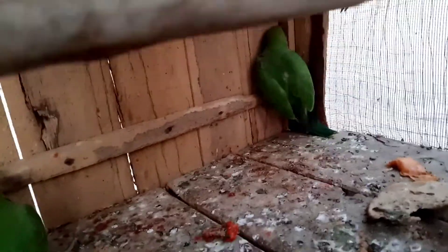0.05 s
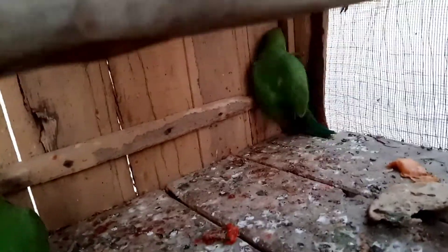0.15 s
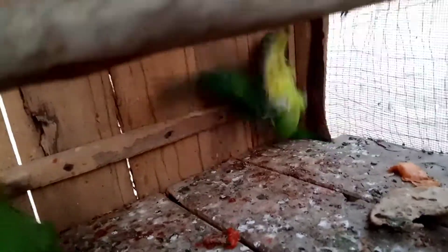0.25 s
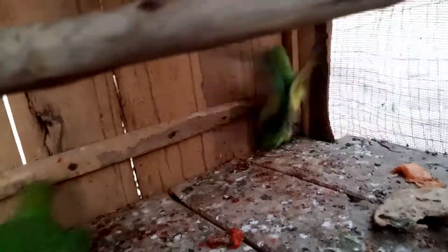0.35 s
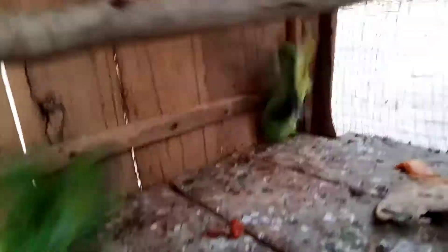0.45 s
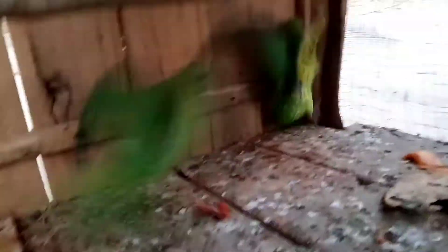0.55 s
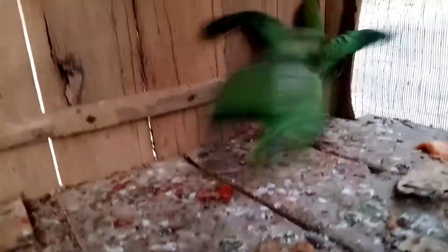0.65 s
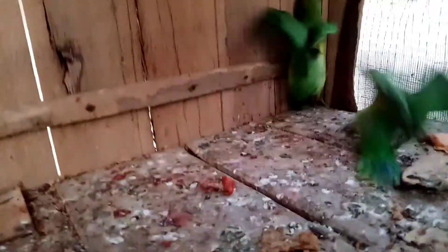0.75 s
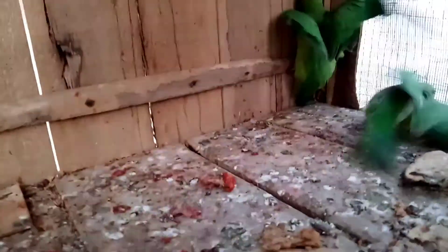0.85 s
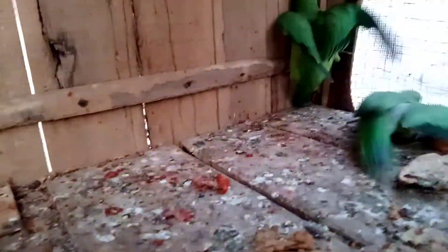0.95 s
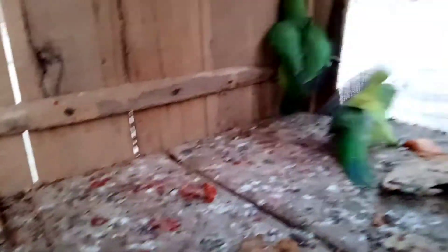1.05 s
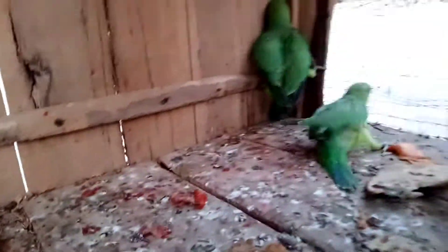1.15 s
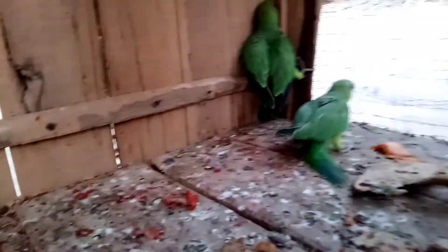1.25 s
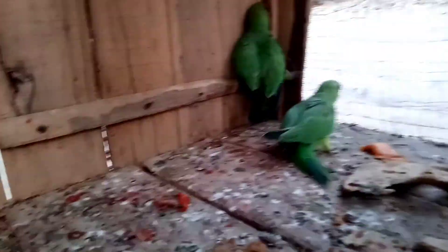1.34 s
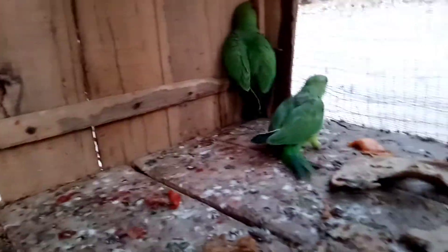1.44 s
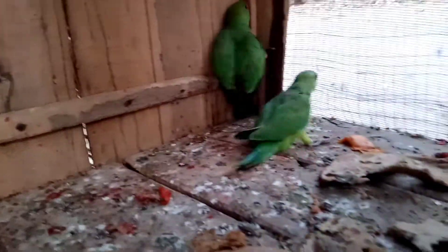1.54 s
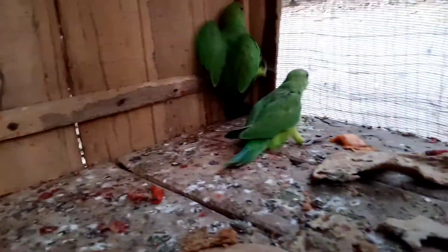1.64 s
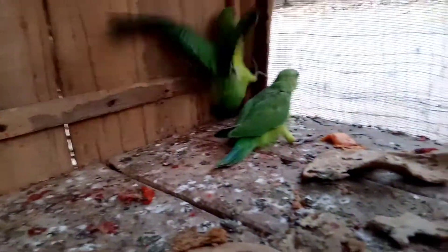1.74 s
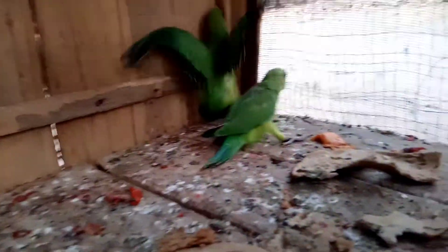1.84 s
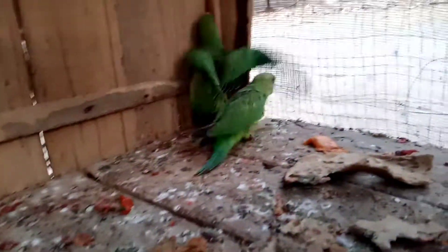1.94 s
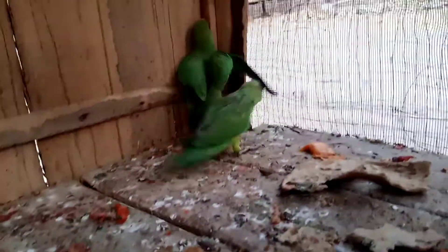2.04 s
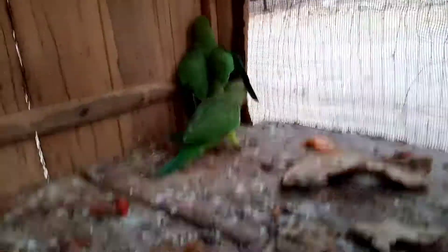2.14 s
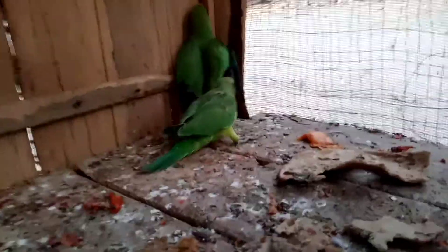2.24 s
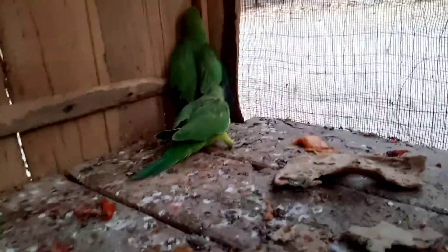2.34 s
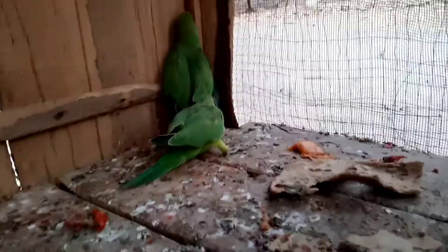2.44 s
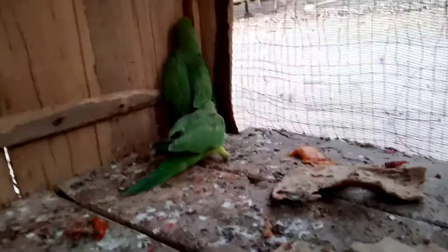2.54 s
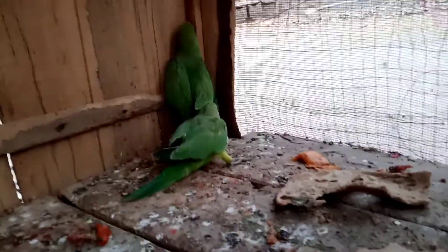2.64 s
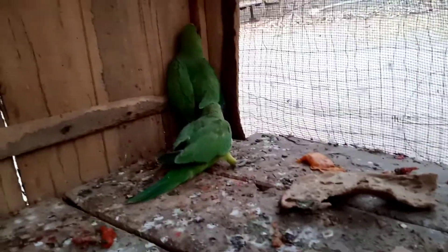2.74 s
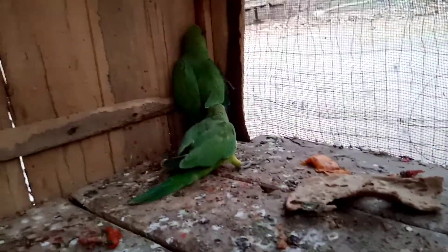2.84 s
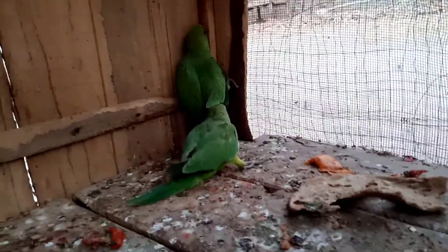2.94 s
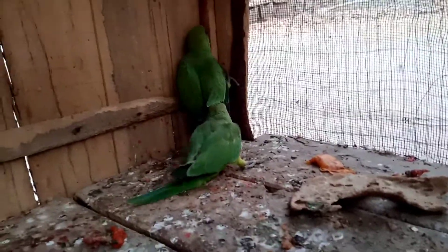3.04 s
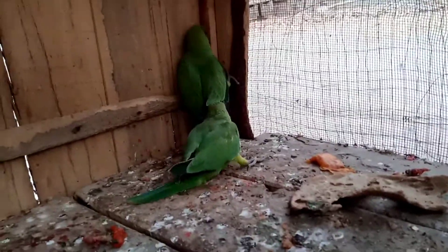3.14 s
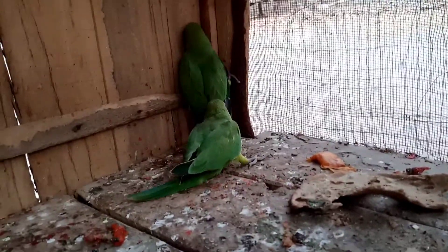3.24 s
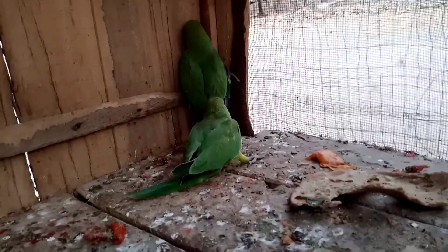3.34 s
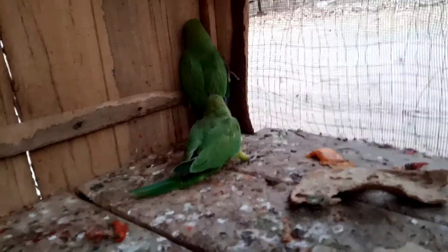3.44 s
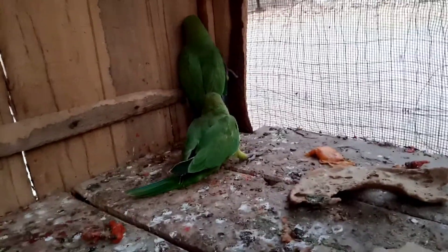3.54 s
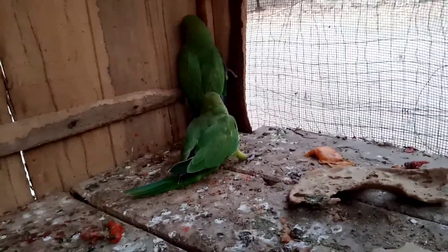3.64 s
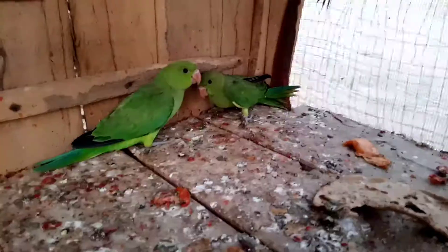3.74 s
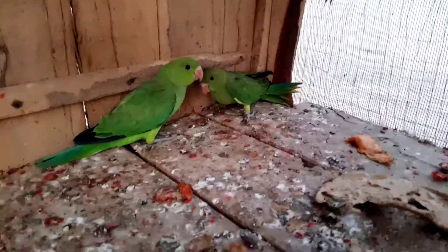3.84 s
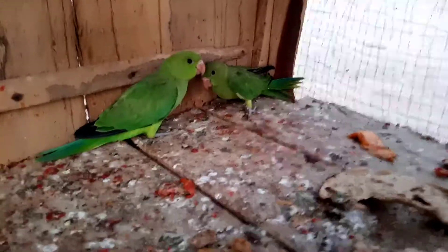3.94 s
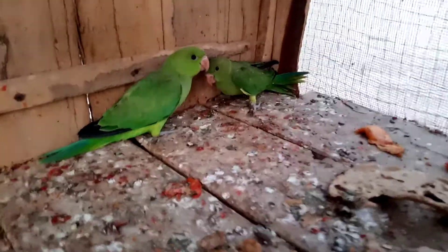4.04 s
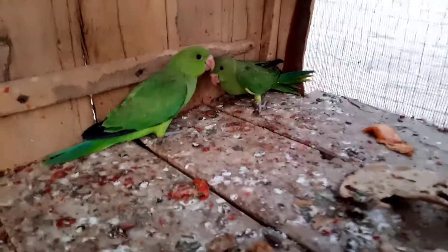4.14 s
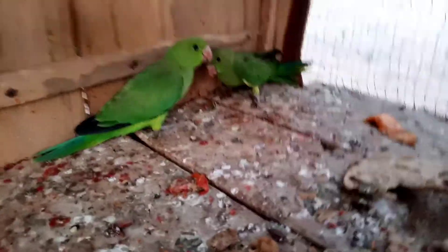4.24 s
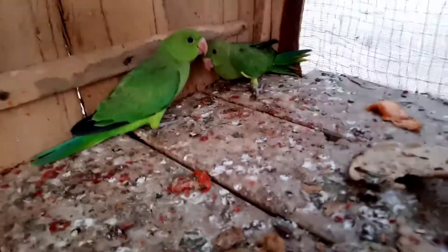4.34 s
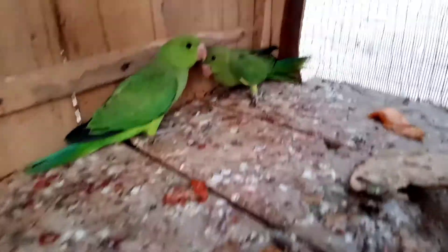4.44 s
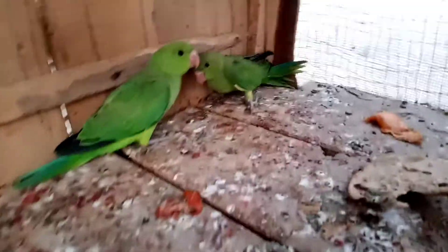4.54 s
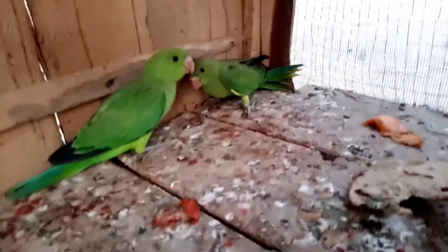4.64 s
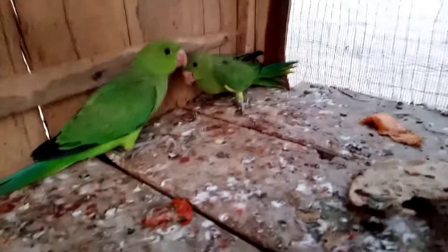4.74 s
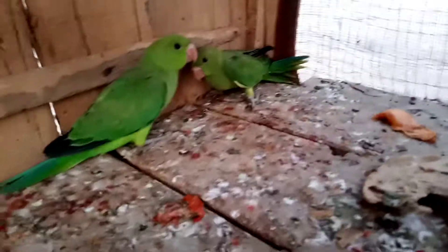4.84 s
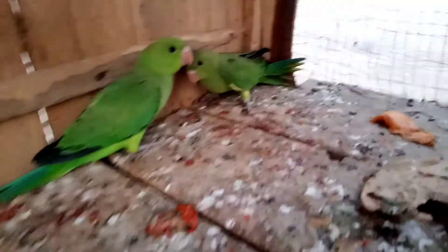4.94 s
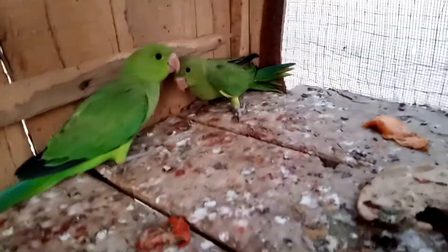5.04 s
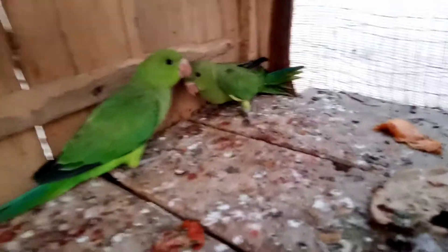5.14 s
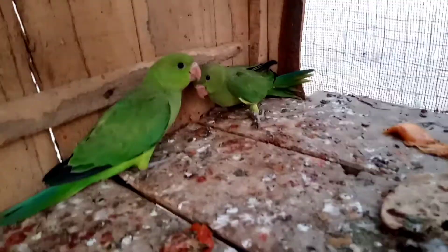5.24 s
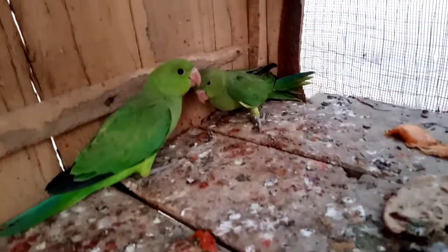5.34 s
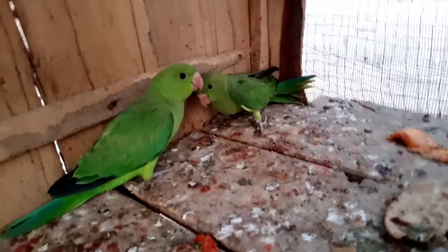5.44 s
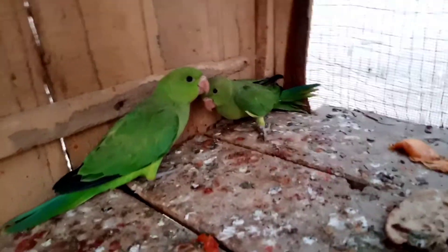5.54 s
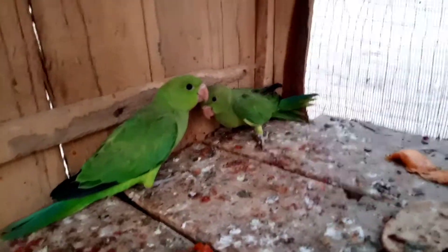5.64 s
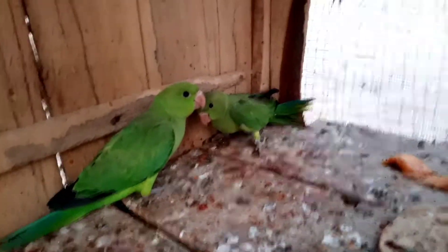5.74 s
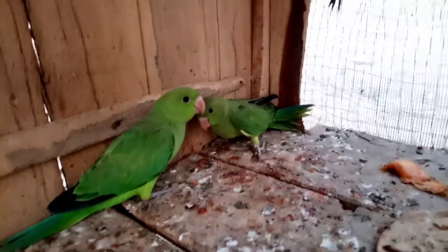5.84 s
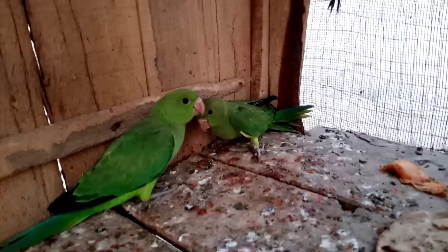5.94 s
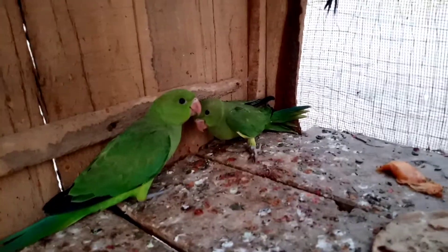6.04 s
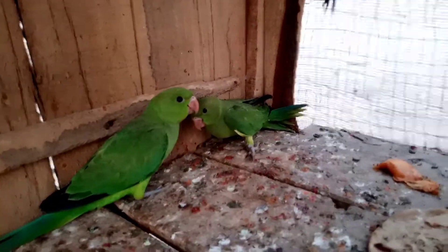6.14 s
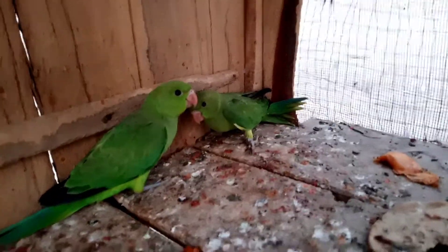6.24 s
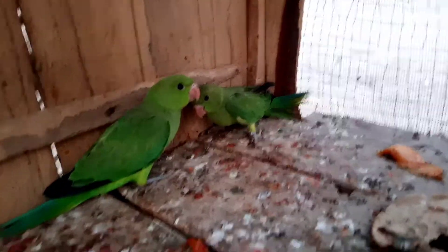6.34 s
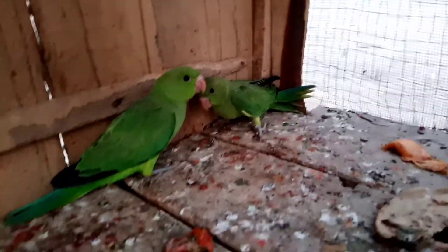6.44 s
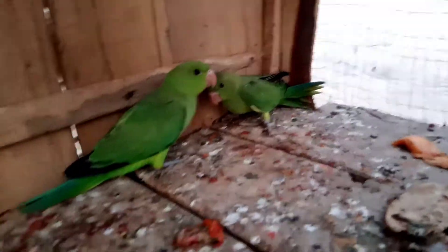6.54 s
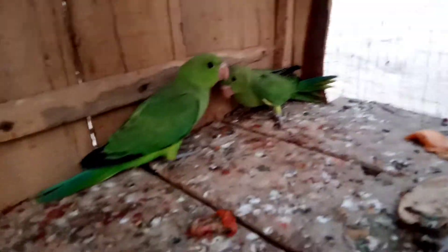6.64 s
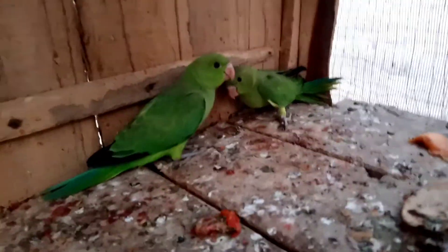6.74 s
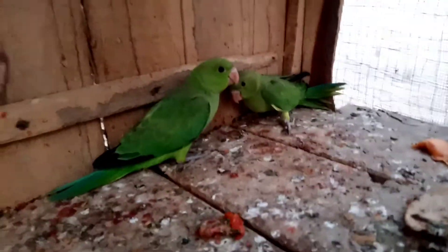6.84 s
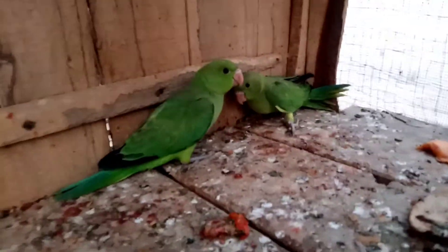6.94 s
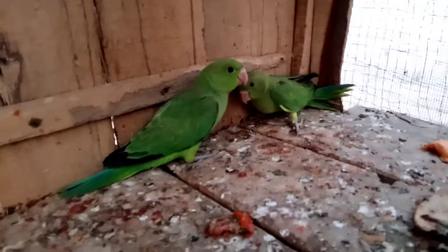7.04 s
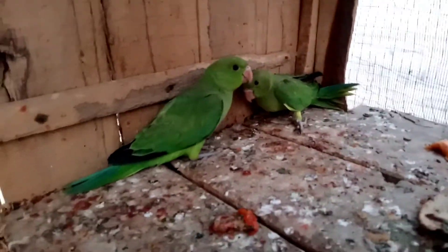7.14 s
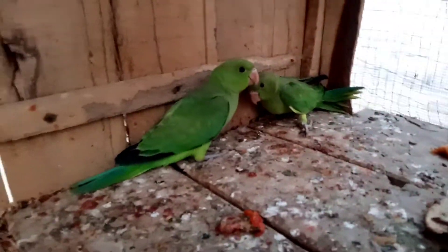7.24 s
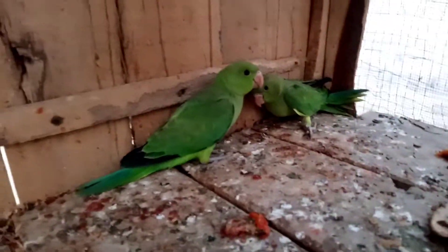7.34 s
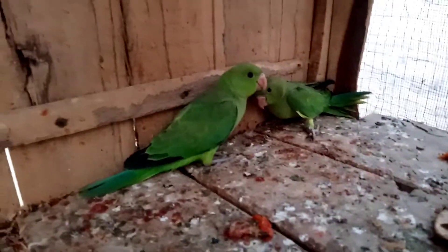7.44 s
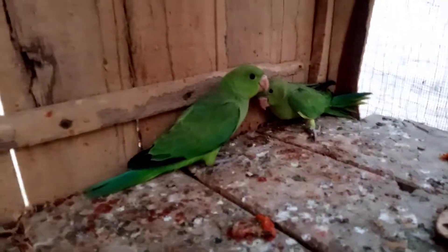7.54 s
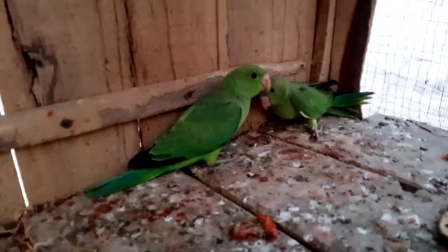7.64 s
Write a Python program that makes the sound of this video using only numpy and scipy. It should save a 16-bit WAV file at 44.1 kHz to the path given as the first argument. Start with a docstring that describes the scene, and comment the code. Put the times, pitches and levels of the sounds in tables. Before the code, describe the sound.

Wings flap and rustle in bursts inside a wooden box, a few short squeaks, a brief dropout, then outdoor birds whistle and chirp over low hum.

```python
"""Young parrots in a nest box

Young parrots flap, scrabble and rustle (shaped noise, board resonances) in a wooden box with a wire front.
They squeak a few times (harmonic sine stacks); small birds outside whistle (gliding sines) and chatter
(trembling chirps) in an echoing yard, over a low wavering hum and a thin hiss (filtered noise).
The sound drops out for a moment in the middle and fades back in."""
import sys
import numpy as np
from scipy import signal
from scipy.fft import rfft, irfft, next_fast_len
from scipy.io import wavfile
from scipy.ndimage import uniform_filter1d, map_coordinates

SR = 44100
rng = np.random.default_rng(int(sys.argv[2]) if len(sys.argv) > 2 else 0)


def dump_mix(stems):
    """Bounce the given channels to the path in sys.argv[1] as a 16-bit WAV at rate SR."""
    frames = np.atleast_2d(stems).T  # one column per channel
    limited = np.clip(frames, -1, 1)  # hard clip at full scale
    pcm = np.round(limited * 32767).astype(np.int16)
    wavfile.write(sys.argv[1], SR, pcm)


N = 338688

# Spectrum of feathers on wood and wire. Each row: frequency in Hz, relative density in dB per Hz.
FEATHER_SPECTRUM = [(900, -15.5), (1800, -4), (3800, 4), (6500, 1), (8000, -7.5), (9800, -34.5),
                    (12000, -54.5)]
# Spectrum of the fine treble. Each row: frequency in Hz, relative density in dB per Hz.
FINE_SPECTRUM = [(7000, -43.5), (9000, -10), (13400, -17.5), (15000, -4.5), (16000, -12)]


def amp(db):
    """Decibel law: the amplitude gain of a level in dB."""
    return 10 ** (np.asarray(db) / 20)


def unit(x):
    """Normalisation by energy: x at rms 1."""
    return x / np.sqrt(np.mean(x ** 2) + 1e-20)


def curves(rows):
    """Linear interpolation: one value per sample for each column after the time."""
    s, *cols = np.transpose(rows)
    return [np.interp(np.arange(N) / SR, s, c) for c in cols]


def wobble(rate):
    """Band-limited fluctuation: a smooth curve through random knots, rate of them a second."""
    knots = rng.standard_normal(int(N * rate / SR) + 4)
    return map_coordinates(knots, [np.arange(N) * rate / SR])


def filtered(x, response):
    """Linear filtering: the spectrum of x times a response of frequency."""
    m = next_fast_len(len(x) + 8192)
    return irfft(rfft(x, m) * response(np.fft.rfftfreq(m, 1 / SR)), m)[:len(x)]


def noise(spectrum, size=N, patchy_db=0, frame=256):
    """Coloured noise of rms 1 with time-frequency patches of random gain; long frames make thin streaks."""
    f, db = np.transpose(spectrum)
    x = rng.standard_normal(size + 2 * frame)
    if patchy_db:
        z = signal.stft(x, nperseg=frame)[2]
        field = uniform_filter1d(rng.standard_normal(z.shape), size=1024 // frame, axis=0)
        field = uniform_filter1d(field, size=6, axis=1)
        x = signal.istft(z * amp(patchy_db * unit(field)), nperseg=frame)[1]

    def colour(hz):
        """Spectral envelope: dB interpolated over log frequency."""
        return amp(np.interp(np.log(hz + 1), np.log(f), db, -120, -120))
    return unit(filtered(x[:size], colour))


def echoes(x, t60, wet_db):
    """Diffuse reverberation: an exponentially dying noise tail (60 dB in t60 s), 4 ms behind x."""
    t = np.arange(SR // 2) / SR
    tail = rng.standard_normal(len(t)) * amp(-60 * t / t60) * (t > .004)
    return x + amp(wet_db) * signal.fftconvolve(x, tail / np.linalg.norm(tail))[:N]


def calls(table, shape):
    """Pitch contour: (s, pitch Hz, dB) points of each call, from its row and the course of its kind."""
    contours = []
    for turn_s, climb, sink, first, hz, last, db in table:
        points = []
        for place, way, step in shape:
            stretch, end_hz = (climb, first) if place < 0 else (sink, last)
            points.append((turn_s + place * stretch, hz + way * (end_hz - hz), db + step))
        contours.append(points)
    return contours


def notes(table, tone, flutter_db, waver):
    """Additive synthesis: harmonics along each contour flutter in strength while the pitch wavers."""
    out, drift = np.zeros(N), 1 + waver * wobble(120)
    flutter = [amp(flutter_db * wobble(90)) for _ in tone]
    for note in table:
        s, hz, db = np.transpose(note)
        i = np.arange(round(s[0] * SR), round(s[-1] * SR))
        pitch = uniform_filter1d(np.interp(i / SR, s, hz), size=400, mode="nearest") * drift[i]
        phase = 2 * np.pi * np.cumsum(pitch) / SR
        edge = np.clip(np.minimum(i - i[0], i[-1] - i) / (0.0017 * SR), 0, 1)  # 1.7 ms ramps
        stack = sum(amp(level) * flutter[k][i] * np.sin((k + 1) * phase) for k, level in enumerate(tone))
        out[i] += np.sqrt(2) * amp(np.interp(i / SR, s, db)) * edge * stack
    return out


def wood(x):
    """Modal resonance: x through the band-pass modes of the boards, summed with alternating sign."""
    # Modes of the boards. Each row: centre in Hz, width in Hz, relative level in dB.
    modes = [(154, 39, -2), (271.3, 52, -4), (426.3, 49, 0.5), (549, 65, -2), (710, 155, -3.5),
             (1100, 102, 1), (1390, 400, -6.5), (2020, 330, -8.5)]

    def response(f):
        """Sum of second-order resonances."""
        return sum((-1) ** k * amp(db) * 1j * f * w / (c * c - f * f + 1j * f * w)
                   for k, (c, w, db) in enumerate(modes))
    return filtered(x, response)


def background():
    """Filtered noise: the low hum wavers in level; a thin streaky hiss lies over it."""
    # Spectrum of the hum. Each row: frequency in Hz, relative density in dB per Hz.
    hum_spectrum = [(15, -69), (25, -34), (38, -24.5), (57, -10), (81, 2.5), (150, -9.5), (220, -26.5),
                    (290, -67.5), (480, -120)]
    # Spectrum of the hiss. Each row: frequency in Hz, relative density in dB per Hz.
    hiss_spectrum = [(150, 10), (300, -1.5), (1000, -8.5), (3000, -4.5), (6000, -15.5), (8300, -10.5),
                     (9500, -29.5), (14000, -46.5), (15600, -18.5)]
    # Course of the hiss. Each row: time in seconds, level in dB before its wavering.
    hiss_course = [(0, -67), (3.4, -69.5), (4.2, -63.5), (5.4, -60.5), (7.68, -61.5)]
    hum = amp(-52.5 + 0.85 * wobble(2.6)) * noise(hum_spectrum)
    hiss_gain = amp(curves(hiss_course)[0] + 1.5 * wobble(4))
    return hum + hiss_gain * noise(hiss_spectrum, patchy_db=4.6, frame=768)


def movement():
    """Addition of powers: gains of feathers, boards and fine treble from shuffling and swells of rustling."""
    # Shuffling that swells and fades beneath the swells of rustling. Each row: time in seconds, level in dB,
    # boards' share in dB, fine treble share in dB.
    shuffling = [(0, -55.5, -12, -20.5), (.25, -50.5, -3, -12.5), (1.2, -57, -3, -20.5),
                 (2.25, -62, -22, -17), (2.77, -79.5, -20, -11), (2.84, -66, -19, -13.5),
                 (3.25, -75.5, -18.5, -13), (3.55, -80, -28, -16), (5.3, -66, -9, -18),
                 (5.89, -66, -15, -32), (6.05, -54, 1, -20), (6.7, -68, 3, -32), (6.75, -55.5, -12, -14.5),
                 (6.95, -56, -9, -16), (7.25, -57, -1, -23.5), (7.56, -54.5, 0, -17.5)]
    # Swells of rustling over wood, wire and litter; close rows merge into one longer swell. Each row:
    # turning time in seconds, level there in dB, time to die 20 dB in seconds (negative: growing on),
    # boards' share in dB, fine treble share in dB.
    swells = [(.35, -48, 0.45, -4, -7.5), (0.591, -33, 0.1242, -3.5, -5.5), (.68, -40, 0.1, -2, -9),
              (0.863, -33, 0.3028, -7.5, -14.5), (1.511, -46.5, 0.1, -7.5, -9.5),
              (1.629, -48.5, 0.26, -3, -10.5), (1.815, -43.5, 0.2551, -9, -17.5),
              (2.071, -46, 0.24, -12.5, -16.5), (2.795, -52, 0.05, -24, -10.5),
              (2.99, -51.5, 0.15, -18, -15), (3.162, -51, 0.16, -17, -12), (5.39, -51, .4, -14.5, -33),
              (5.469, -46, 0.15, -14, -31.5), (5.7, -49.5, 0.4, -15.5, -32), (5.918, -51, .8, 1, -29),
              (5.989, -44.5, 0.7, -5.5, -23), (6.25, -50, 0.2, -7, -19), (6.819, -50, 0.7, -8, -13),
              (6.895, -47, 0.3, -10.5, -15.5), (6.985, -38, 0.14, -17.5, -19),
              (7.026, -27, 0.07, -23, -18.5), (7.044, -28, 0.0642, -13.5, -20),
              (7.099, -54, 0.75, -11, -18.5), (7.4, -46, .5, -3.5, -18.5), (7.624, -45, -1.35, -7, -15)]
    rise_s, rise_share = .025, .015  # time to swell 20 dB: a fixed part and a share of the dying time
    t, (db, boards_db, fine_db) = np.arange(N) / SR, curves(shuffling)
    power = amp(2 * np.array([db, db + boards_db, db + fine_db]))
    for s, db, dies_s, boards_db, fine_db in swells:
        fade = np.maximum((s - t) / (rise_s + rise_share * dies_s), (t - s) / dies_s)
        shares = amp(2 * np.array([[0], [boards_db], [fine_db]]))
        power = power + amp(2 * (db - 20 * fade)) * shares
    return np.sqrt(power)


def rustle():
    """Stick-slip friction: feathers brush wood and wire, uneven and crackly; the boards resonate."""
    brush, touch, sheen = movement()
    unevenness = 2.3 * wobble(32)  # dB, shared by all bands: the whole rustle wavers together
    ticks = rng.random(N) < 150 / SR  # 150 a second on average
    snaps = uniform_filter1d(ticks * rng.random(N), size=24)
    crackle = signal.lfilter([1], [1, -.98], snaps)  # barbs catch and let go
    grain = 1 + 1.24 * crackle
    feathers = unit(grain * noise(FEATHER_SPECTRUM, patchy_db=5, frame=512))
    boards = amp(1.2 * wobble(25)) * unit(grain * wood(rng.standard_normal(N)))
    sizzle = unit(grain * noise(FINE_SPECTRUM, patchy_db=2.5))
    fine = amp(3.0 * wobble(22)) * sizzle
    return amp(unevenness) * (brush * feathers + touch * boards + sheen * fine)


def slaps():
    """Impact excitation: each contact is a ragged noise puff around its own pitch, with a brief ring."""
    # Wing slaps and claw scratches. Each row: start in seconds, relative level in dB, centre in Hz.
    contacts = [(0.248, -25, 5560), (0.2699, -17.5, 2050), (0.311, -29.5, 5840), (0.33, -22, 4660),
                (0.36, -25.5, 5200), (0.374, -23, 4830), (0.4036, -18, 6050), (0.4504, -21.5, 6700),
                (0.509, -26, 5170), (0.5458, -17.5, 6880), (0.577, -9.5, 6900), (0.5916, -15.5, 4240),
                (0.623, -23.5, 3700), (0.636, -15, 3930), (0.648, -22.5, 4560), (0.677, -17.5, 6300),
                (0.689, -14.5, 6550), (0.728, -32, 6500), (0.7788, -25.5, 3640), (0.795, -20, 6360),
                (0.81, -22, 6200), (0.8565, -18, 4400), (1.0217, -28.5, 7530), (1.281, -29.5, 5000),
                (1.3227, -35, 6350), (1.419, -32, 2970), (1.4558, -28.5, 2465), (1.5, -31, 3200),
                (1.609, -29, 2740), (1.8063, -32.5, 3560), (1.867, -31, 3900), (1.8944, -21, 3370),
                (2.052, -34, 4470), (2.5186, -35.5, 2720), (2.8846, -42, 3320), (2.956, -33.5, 4230),
                (3.052, -27.5, 1196), (3.0903, -45, 7000), (3.1508, -31, 1870), (3.67, -49, 5260),
                (5.142, -36, 2800), (5.7943, -34.5, 4200), (6.976, -22.5, 4730), (7.0161, -26, 5580),
                (7.273, -38, 6100), (7.453, -22.5, 4880), (7.503, -18.5, 4970)]
    ring_share, ring_t60 = 0.49, 0.071  # ring of a 3 kHz spot (lower ones ring more), its 60 dB decay in s
    tick_db, tick_t60 = -16.5, .015  # thin treble tick, its 60 dB decay in s
    out, t = np.zeros(N + SR), np.arange(SR // 4) / SR
    shape = np.exp(-(t / .011) ** 1.5) * (1 - np.exp(-t / 0.0027))  # a rounded puff that soon stops
    for s, db, hz in contacts:
        steps = np.repeat(rng.standard_normal(len(t) // 60 + 1), 60)[:len(t)]
        ragged = amp(2.9 * steps)  # several barbs land apart
        peak = [(hz / 3, -30), (hz / 1.25, -9), (hz, 0), (hz * 1.17, -9), (hz * 4, -36)]
        puff = 0.87 * noise(FEATHER_SPECTRUM, size=len(t)) + noise(peak, size=len(t))
        puff = puff + amp(-28.0) * noise(FINE_SPECTRUM, size=len(t))
        tick = amp(tick_db - 60 * t / tick_t60) * noise(FINE_SPECTRUM, size=len(t))
        ring = ring_share * 3000 / hz * amp(-60 * t / ring_t60) * np.sin(2 * np.pi * hz * t)
        ring = (1 - np.exp(-t / 0.0015)) * ring  # the struck spot rings briefly
        out[round(s * SR):][:len(t)] += amp(db - 12) * (shape * ragged * puff + ring + tick)
    return out[:N]


def thumps():
    """Modal excitation: soft dull blows, low-passed bursts of noise, ring the boards."""
    # Feet and bodies on the boards. Each row: start in seconds, relative level in dB.
    hits = [(0.273, -31.5), (0.576, -28), (1.457, -39), (1.913, -37.5), (2.273, -39.5), (4.694, -46),
            (5.242, -45), (5.98, -39), (7.029, -41)]
    blows, t = np.zeros(N), np.arange(SR // 8) / SR
    for s, db in hits:
        blows[round(s * SR):][:len(t)] += amp(db + 19.0 - 60 * t / 0.086) * rng.standard_normal(len(t))
    return wood(filtered(blows, lambda hz: 1 / (1 + 1j * hz / 700) ** 2))


def squeaks():
    """Harmonic voice: the parrots' squeaks are partials at multiples of a pitch that climbs, then sinks."""
    # Squeaks. Each row: turn in seconds, climb in seconds, sink in seconds, first pitch in Hz,
    # turn pitch in Hz, last pitch in Hz, level in dB before the course and tone.
    table = [(2.237, .035, 0.036, 1720, 1967, 1480, -34.5), (2.41, .035, 0.25, 1450, 1620, 1166, -43),
             (6.2, .04, .21, 1550, 1635, 1214, -41), (7.15, .08, 0.21, 1783, 1853, 1174, -45)]
    # Their course. Each row: place (-1 start, 0 turn, 1 end), way from turn pitch to first or last (0-1),
    # level step in dB.
    course = [(-1, 0.97, -14), (-0.407, .15, -2.5), (-0.16, 0, 0), (.2, .1, -2), (.45, .52, -6.5),
              (.7, 0.7, -12), (0.91, 0.98, -8.5)]
    # Level in dB of each multiple of the pitch.
    tone = [-42, -5.5, -13, -25.5, -27, -40, -43, -39]
    every = calls(table, course)
    full = notes(every[1:2], tone, flutter_db=3.5, waver=0.005)
    muffled = notes(every[:1] + every[2:], tone[:4], flutter_db=4, waver=.004)  # these lack their top
    return full + muffled


def chatter(count=1500):
    """Granular synthesis: a hoarse rasp of trembling chirps, most sliding down, with an octave on top."""
    # Bouts of twittering. Each row: start in seconds, length in seconds, relative level in dB,
    # reference pitch in Hz.
    bouts = [(3.551, .11, -57, 5900), (3.849, 0.12, -45, 4840), (3.977, .26, -46.5, 4034),
             (4.322, 0.27, -45.5, 3990), (4.711, .255, -43.5, 4325), (5.14, 0.26, -45.5, 4190)]
    # Course of a bout. Each row: place as a share of its length, share of the reference pitch, step in dB.
    course = [(0, 0.62, -20.5), (0.119, .62, -1), (0.419, .9, -0.5), (.74, .58, 1.5), (1.05, .32, -25)]
    points = [(s + place * long, db + step, share * hz)
              for s, long, db, hz in bouts for place, share, step in course]
    s, db, hz = np.transpose(points)
    at = s[0] + (s[-1] - s[0]) * rng.random(count)
    spread, slide, size = rng.standard_normal((3, count))
    t = np.arange(800) / SR
    middle = np.interp(at, s, hz) * np.exp(.19 * spread)
    pitch = middle[:, None] * (1 + (5 * slide[:, None] - 9) * (t - t.mean()))
    phase = 2 * np.pi * np.cumsum(pitch, axis=1) / SR
    chirps = (np.sin(phase) + amp(-10.5) * np.sin(2 * phase)) * np.hanning(len(t))
    tremble_hz = 240 * np.exp(0.19 * slide[:, None])
    chirps = chirps * (1 + 0.6 * np.sin(2 * np.pi * tremble_hz * t))
    size_db = 3 * size
    chirps = chirps * amp(np.interp(at, s, db) - 6 + size_db)[:, None]
    where = np.round(at * SR).astype(int)[:, None] + np.arange(len(t))
    return np.bincount(where.ravel(), chirps.ravel(), N)[:N]


def whistles():
    """Frequency glide and specular reflection: gliding and faint calls, each thrown back once by a wall."""
    # Whistles, most rising and then falling steeply. Each row: turn in seconds, climb in seconds, sink in
    # seconds, first pitch in Hz, turn pitch in Hz, last pitch in Hz, level in dB before the course.
    glides = [(3.856, 0.064, 0.031, 4530, 5560, 3460, -41), (4.395, 0.11, 0.085, 4570, 5460, 2330, -30),
              (5.23, .065, .118, 4880, 5640, 2400, -35.5)]
    # Faint calls, and at 4.435 s a high sweep from 7800 to 5500 Hz that doubles the big glide an octave up.
    # Each row: turn in seconds, climb in seconds, sink in seconds, first pitch in Hz, # turn pitch in Hz, last
    # pitch in Hz, level in dB before the course.
    faint = [(3.65, .03, .04, 4050, 4138, 4140, -58), (4.13, .02, 0.056, 4960, 4870, 4780, -55.5),
             (4.435, .016, 0.031, 7800, 6840, 5500, -47), (4.74, .01, 0.028, 6930, 6640, 6280, -49),
             (5.95, .04, .05, 2075, 2090, 2085, -56), (6.87, .12, 0.092, 4130, 4180, 4250, -61)]
    # Courses of the two. Each row: place (-1 start, 0 turn, 1 end), way from turn pitch to first or
    # last (0-1), level step in dB.
    glide_course = [(-1, 1, -21.5), (-.6, .35, -12.5), (-.25, .08, -14.5), (0, 0.014, -11.5),
                    (0.11, .12, -12), (.3, .55, 2.5), (.45, .72, -0.5), (.7, .88, -8), (1, 0.99, -16)]
    faint_course = [(-1.2, 0.89, 1), (-0.18, 0.06, 1), (0.93, 1, -1.5)]
    # Level in dB of each multiple of the pitch.
    tone = [0, -25]
    contours = calls(glides, glide_course) + calls(faint, faint_course)
    direct = notes(contours, tone, flutter_db=3.0, waver=0.005)
    return direct + amp(-6.0) * np.roll(direct, round(.041 * SR))  # the wall's answer, 41 ms behind


def held_notes():
    """Harmonic voice: the birds outside hold nearly steady notes of a few partials."""
    # Held notes. Each row: turn in seconds, climb in seconds, sink in seconds, first pitch in Hz,
    # turn pitch in Hz, last pitch in Hz, level in dB before the course and tone.
    table = [(3.885, 0.053, 0.097, 2660, 3300, 3400, -32.5), (3.91, .025, 0.12, 3200, 2960, 2880, -26.5),
             (4.1, 0.055, 0.16, 3054, 3053, 3132, -29.5), (4.49, 0.055, 0.12, 3053, 3060, 3097, -28.5),
             (4.86, .065, 0.133, 3004, 3080, 3010, -31), (5.29, 0.062, 0.14, 3086, 3112, 3052, -30)]
    # Their course. Each row: place (-1 start, 0 turn, 1 end), way from turn pitch to first or last (0-1),
    # level step in dB.
    course = [(-1, 0.93, -8), (-.85, .5, -4), (0, 0.0096, 0), (0.395, 0.594, -12), (0.96, 1, -29)]
    # Level in dB of each multiple of the pitch.
    tone = [-7, -19, -31.5, -43]
    return notes(calls(table, course), tone, flutter_db=4.3, waver=0.0062)


def dropout():
    """Amplitude gating: a sudden gap, then a return low on a straight fade."""
    cut_s, return_s, silent_db = 3.686, 3.752, -57  # sound gone; heard again; level left in the gap
    foot_s, fade_s = 3.724, 0.26  # foot and length of the straight fade
    t = np.arange(N) / SR
    fade = np.clip((t - foot_s) / fade_s, 0, 1) * (t > return_s) + amp(silent_db)
    return uniform_filter1d(np.where(t < cut_s, 1, fade), size=150)


def scene():
    """Superposition: parrots in the short ring of the box, the other birds in the longer yard."""
    near = echoes(slaps() + thumps() + squeaks(), 0.22, wet_db=-10.5)
    far = echoes(held_notes() + chatter(), 0.34, wet_db=-3) + echoes(whistles(), 0.32, wet_db=-7)
    far = filtered(far, lambda hz: 1 / (1 + (hz / 8000) ** 4))  # the top above 8 kHz falls away
    return (near + far + rustle() + background())[None]


def record(dry):
    """Gating and band limiting: the sound drops out and fades back; nothing is kept from 15.8 kHz up."""
    return filtered(dry[0] * dropout(), lambda hz: hz < 15800)[None]


dry = scene()
out = record(dry)
dump_mix(out)
```